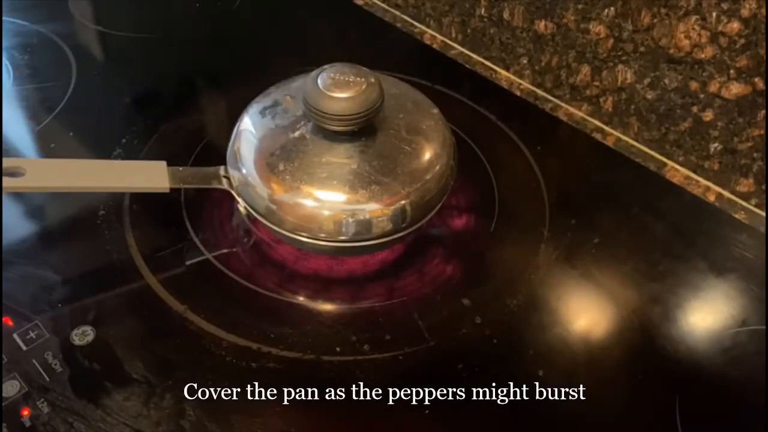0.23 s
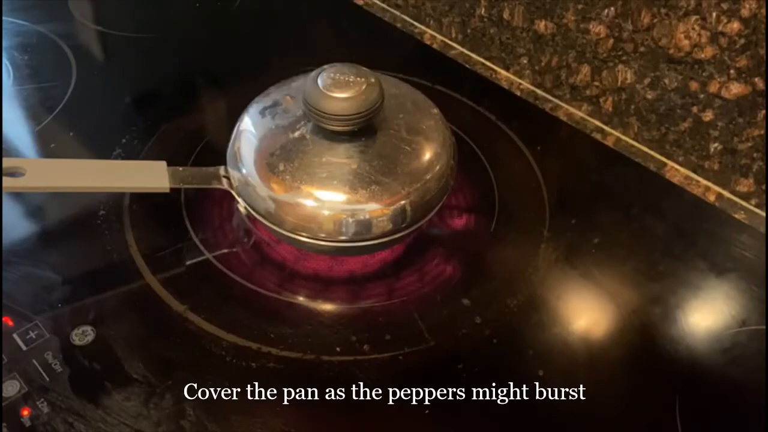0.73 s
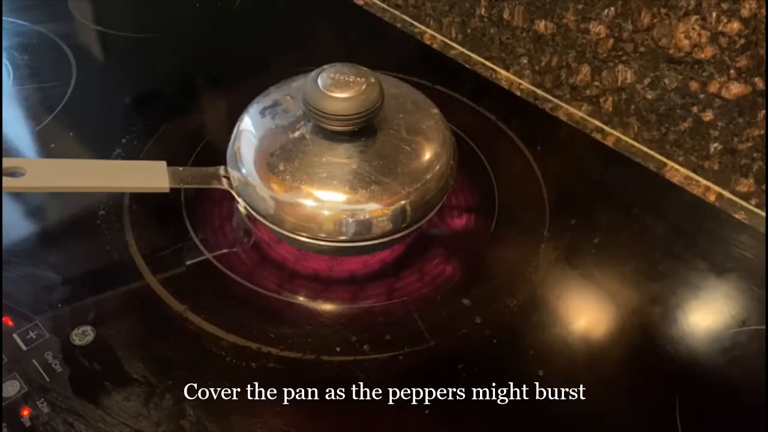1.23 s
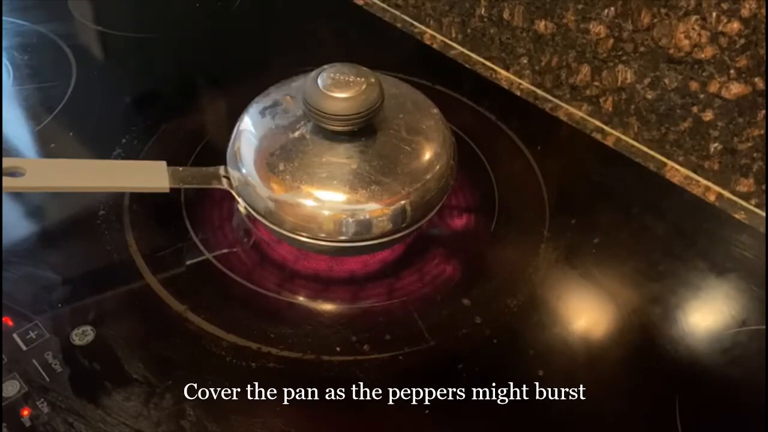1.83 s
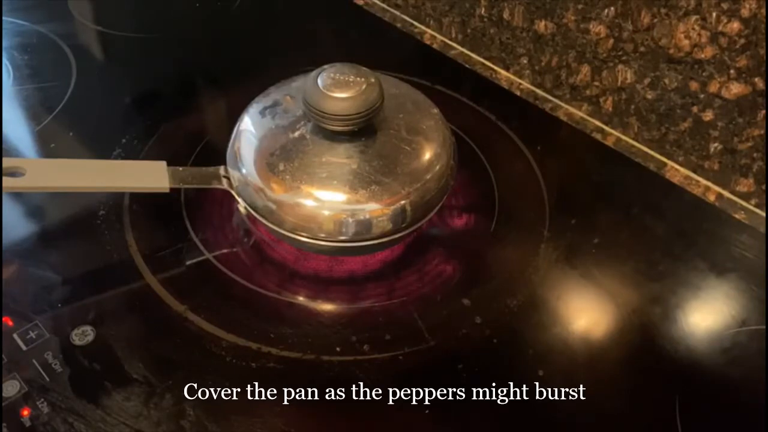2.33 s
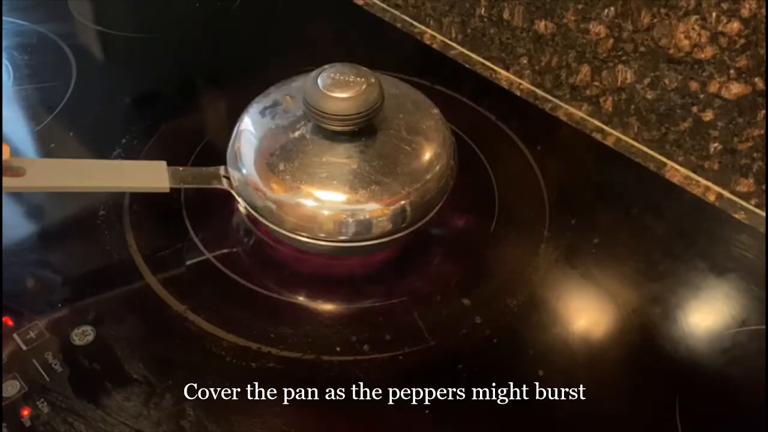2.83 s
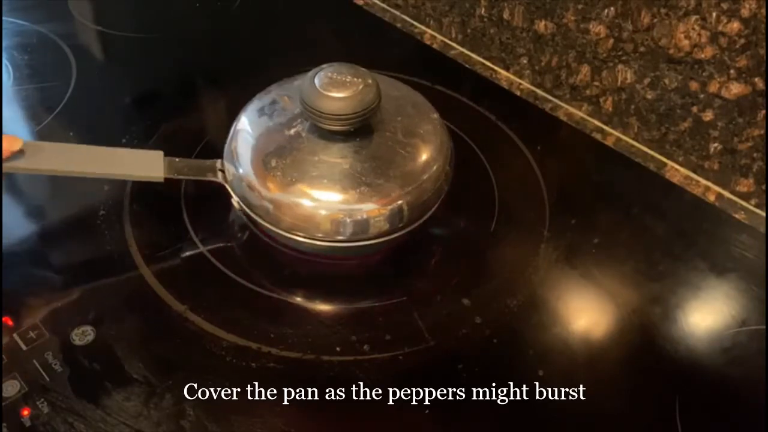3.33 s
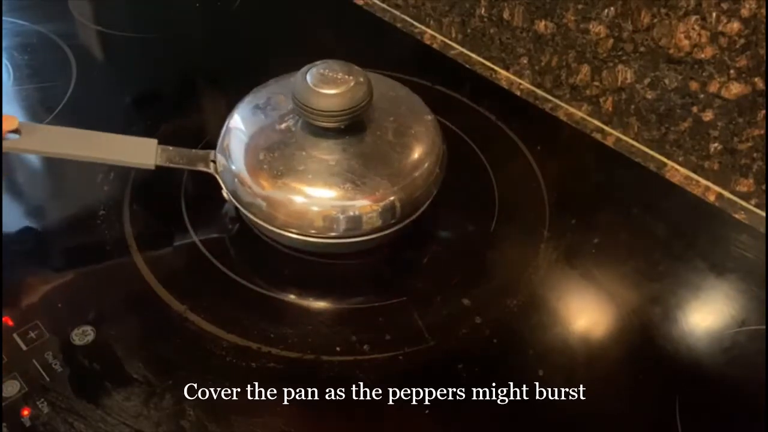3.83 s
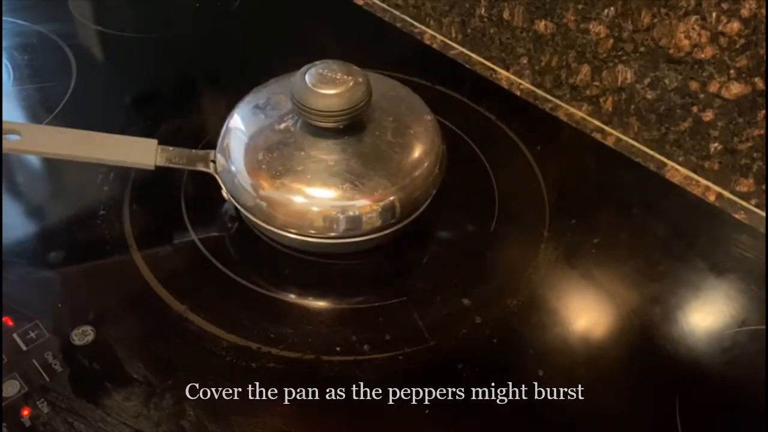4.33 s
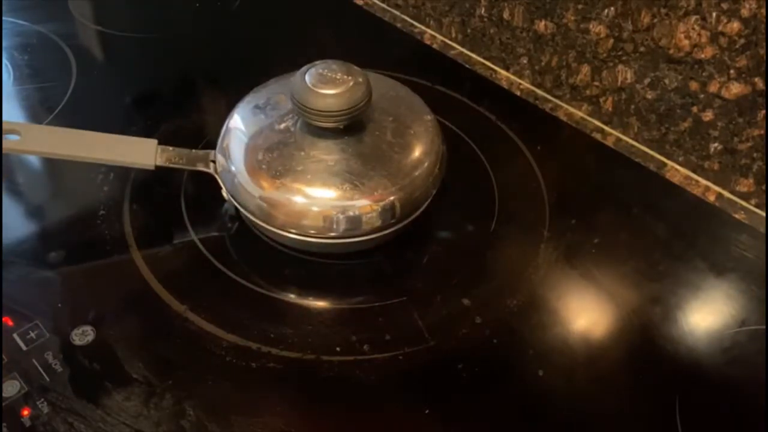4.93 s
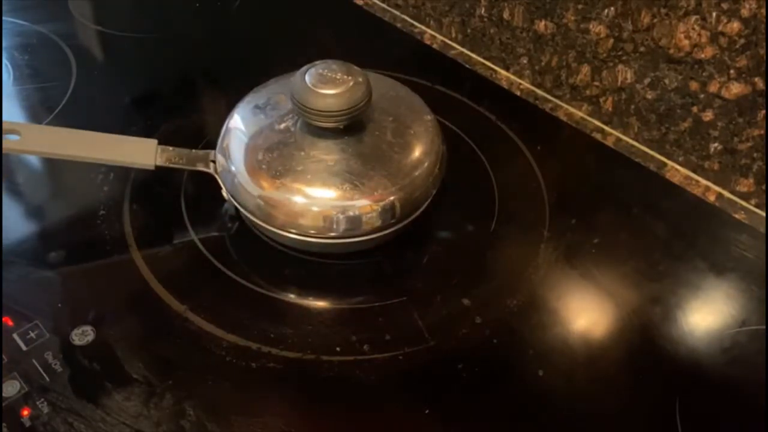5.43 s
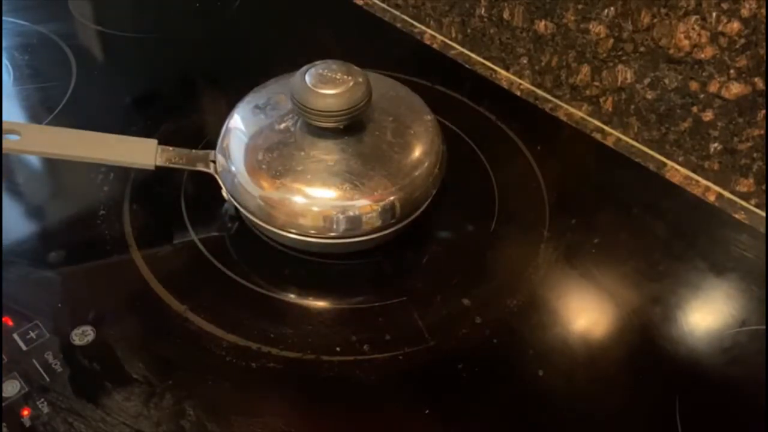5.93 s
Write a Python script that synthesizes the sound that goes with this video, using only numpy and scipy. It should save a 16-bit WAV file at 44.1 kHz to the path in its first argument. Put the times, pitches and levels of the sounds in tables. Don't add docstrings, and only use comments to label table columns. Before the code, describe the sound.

Peppers hiss softly in a covered pan, the metal lid ticking lightly under an extractor hum, with sharp bursts and steam gusts near the end.

```python
import sys
import numpy as np
from scipy import signal
from scipy.fft import rfft, irfft, next_fast_len
from scipy.io import wavfile
from scipy.ndimage import uniform_filter1d

SR = 44100
rng = np.random.default_rng(int(sys.argv[2]) if len(sys.argv) > 2 else 0)


def voltage_ratio(level):
    return 10 ** (np.asarray(level, float) / 20)


def dump(signal):
    limited = np.clip(np.atleast_2d(signal).T, -1, 1)
    pcm = np.round(limited * 32767).astype(np.int16)
    wavfile.write(sys.argv[1], SR, pcm)


N = 273067
TIME = np.arange(N) / SR
PAD = next_fast_len(N)
HZ = np.fft.rfftfreq(PAD, 1 / SR) + 1e-3
OPPOSITE = np.array([[1], [-1]])
CALM_DB = -88


# f/Hz, density/dB per Hz
HISS = [(3000, -18.5), (4500, 1.5), (6000, -1.5), (8000, 1), (10000, -3), (11500, -3), (12300, -9.5)]
# f/Hz, density/dB per Hz
SPUTTER = [(1500, -19), (2500, 0.5), (3500, -3), (5000, -10), (7000, -8.5)]


def sizzle():
    hiss_db = steam_db()
    extra_db = hiss_db - CALM_DB
    bright_db = -2.5 + 0.17 * extra_db + 1.6 * drift(8)
    bright_db = bright_db + sum(lift_db * gate(s, length) for s, length, *_, lift_db in GUSTS)
    sputter_db = -83 + 0.76 * extra_db + 1.5 * drift(22)

    hiss = coloured(grains(12000, spread_db=-2.5), HISS)
    treble_filter = signal.butter(4, 9200, "high", fs=SR, output="sos")
    top = signal.sosfiltfilt(treble_filter, hiss)
    hiss = voltage_ratio(hiss_db + 4.5 + 1.3 * drift(42)) * (hiss - top + voltage_ratio(bright_db + 5.5) * top)
    return hiss + voltage_ratio(sputter_db) * coloured(grains(8000, spread_db=-0.5), SPUTTER)


# t/s, flow as hiss level/dB
FRYING = [(0.0, -94.5), (0.45, -91.5), (0.76, -84), (1.05, -91.5), (1.45, -91), (1.85, -86.5), (2.1, -91),
          (3.1, -94), (3.33, -86), (3.65, -94), (4.2, -90), (4.55, -88), (4.8, -82.5), (5.0, -74),
          (5.1, -80.5), (5.4, -85.5), (6.19, -79.5)]
# t/s, length/s, level/dB, sag/dB per s, treble lift/dB
GUSTS = [
    (4.568, 0.13, -81.5, 13, -2),
    (5.123, 0.095, -73, 8, -4),
    (5.208, 0.13, -71, 9, -1),
    (5.44, 0.22, -69.5, 16, -3),
    (5.648, 0.22, -75.5, -4, 0.5),
    (5.846, 0.173, -72.5, 14, -0.5),
    (5.986, 0.136, -77.5, 1, 1),
    (6.148, .1, -72, 0, -5),
]


def steam_db():
    flow = voltage_ratio(np.interp(TIME, *np.transpose(FRYING))) ** 2
    for s, length, level_db, sag_db, _ in GUSTS:
        gust_db = level_db - sag_db * np.clip(TIME - s, 0, length)
        flow = flow + (gate(s, length) * voltage_ratio(gust_db)) ** 2
    after_db, after_t60_s = -24, 0.73
    for s, puff_db, *_ in BURSTS:
        vent_db = puff_db + after_db - 60 * np.maximum(TIME - s, 0) / after_t60_s
        flow = flow + (TIME > s) * voltage_ratio(vent_db) ** 2
    return 10 * np.log10(flow)


def gate(s, length):
    rise_s, fall_s = 0.055, 0.018
    return np.clip(np.minimum((TIME - s) / rise_s, 1 + (s + length - TIME) / fall_s), 0, 1)


def grains(per_s, spread_db):
    sizes = voltage_ratio(spread_db * np.minimum(rng.exponential(1, N), 5)) * rng.choice([-1, 1], N)
    return sizes * (rng.random(N) < per_s / SR)


# f/Hz, level/dB, t60/s
LID = [(3300, -5, .035), (3610, -5, .035), (3860, -7, .03), (4270, 0, .045), (4600, -6, .03),
       (5250, -1, .04), (5600, -6, .03), (6200, -6, .03), (6800, -6, .03), (7050, 1, .045), (7600, -6, .03),
       (8400, 2, .04), (9100, -6, .03), (9960, -5, .05)]
# f/Hz, density/dB per Hz
SPLASH = [(2200, -17), (3200, -1), (4500, 1), (6000, -6.5), (8500, 0), (10500, -10.5), (12000, -18)]


def lid_ticks():
    s, peak_db = touches()
    ring = struck(LID, s, peak_db - 16, spread_db=3.0)
    ring = ring + struck(LID, np.minimum(s + .017, TIME[-1]), peak_db - 21, spread_db=4.0)
    starts = np.full(N, 1e-18)
    starts[(s * SR).astype(int)] = voltage_ratio(peak_db - 7.5)
    splash = signal.lfilter([1], [1, -voltage_ratio(-60 / (.045 * SR))], starts)
    return ring + splash * coloured(rng.standard_normal(N), SPLASH)


# t into the turn/s, top peak level/dB
CONTACTS = [
    (.0088, -64),
    (.0515, -66),
    (.0590, -69),
]
# t/s, peak level/dB
TICKS = [(0.115, -55.5), (0.316, -58.5), (0.536, -65), (0.7346, -58.5), (0.8011, -70), (0.868, -60),
         (0.91, -62), (1.043, -58.5), (1.174, -60.5), (1.5287, -63), (1.5927, -63), (2.365, -62),
         (2.45, -63), (2.7806, -62), (2.9797, -63), (3.045, -61.5), (3.0876, -57.5), (3.4402, -61),
         (3.4836, -62), (3.746, -58), (3.834, -70.5), (4.0386, -58.5), (4.099, -62), (4.142, -59.5),
         (4.361, -60), (4.599, -57), (4.9324, -57), (5.062, -62), (5.414, -60.5), (6.181, -63)]
# t/s, peak level/dB
TAPS = [(0.058, -60), (0.1905, -76), (0.2064, -70), (0.3885, -67), (0.4559, -73), (0.5197, -69),
        (0.6449, -71), (0.9981, -67), (1.0574, -67), (1.2476, -71), (1.2625, -68), (1.3305, -66),
        (1.3738, -72), (1.701, -61), (1.8986, -57), (1.9734, -62), (2.0507, -78), (2.2962, -73),
        (2.7656, -69), (3.2276, -75), (3.5583, -72), (3.5728, -65), (3.68, -59), (3.8222, -65),
        (3.9429, -78), (4.0158, -68), (4.2073, -68), (4.2727, -67), (4.345, -66), (4.428, -59),
        (4.6833, -60), (4.7406, -66), (3.288, -65), (3.326, -56), (3.354, -56), (3.406, -61)]


def touches():
    turn_s, spread_db, tap_loss_db = .06598, 9, 4
    into, usual_db = np.transpose(CONTACTS)
    turns = np.arange(0, TIME[-1] - 2 * turn_s, turn_s)[:, None]
    light_db = usual_db - spread_db * np.abs(rng.standard_normal((len(turns), len(into))))
    firm, firm_db = np.transpose(TICKS + [(s, db - tap_loss_db) for s, db in TAPS])
    return np.append((turns + into).ravel(), firm), np.append(light_db.ravel(), firm_db)


def spatter(per_s, level_db):
    times = np.sort(rng.random(int(per_s * TIME[-1]))) * TIME[-1]
    return struck(LID, times, level_db - 5 * rng.exponential(1, len(times)), spread_db=4.0)


# t/s, puff level/dB, puff t60/s, puff brightness/dB per octave, rim ring level/dB
BURSTS = [
    (2.177, -54.5, 0.035, -2.5, -78),
    (2.195, -79, 0.18, -9, -95),
    (4.876, -59, 0.019, -8, -95),
    (4.956, -64.5, 0.028, 13, -61.5),
    (4.977, -79, 0.036, 20, -61),
]
# t/s, level/dB, thinness -1 to 1
CRACKS = [
    (2.179, -46, 0),
    (4.8765, -37.5, -.9),
    (4.957, -29, .85),
]
# f/Hz, width/Hz, level/dB
DOME = [(2000, 1100, -2), (2850, 630, 1), (4000, 750, 4), (4860, 860, -3), (5730, 800, 6.5), (6400, 490, 3),
        (7400, 1300, -4), (9000, 2000, 4), (10670, 2100, -9)]
# f/Hz, level/dB, t60/s
RIM = [(6332, -9, .1), (8900, -6, .05), (9938, 0, .14), (10008, -4, .12), (10250, -3, .05), (10542, -1, .1),
       (11298, -1, .12), (11800, -18, .2)]


def bursts():
    out, white = np.zeros(N), rng.standard_normal(N)
    for s, puff_db, t60, bright_db, _ in BURSTS:
        age = np.maximum(TIME - s, 0)
        fade_db = 60 * (age / t60) ** 2.84
        puff = white * (1 - np.exp(-age / 0.0033)) * voltage_ratio(puff_db + 10.5 - fade_db)
        for hz, width_hz, level_db in DOME:
            gain = voltage_ratio(level_db + bright_db * np.log2(hz / 5000))
            out += gain * resonance(resonance(puff, hz, width_hz), hz, width_hz)
    for s, crack_db, thin in CRACKS:
        out[int(s * SR) + np.arange(3)] += voltage_ratio(crack_db) * np.array([1, -2 * thin, thin ** 2])
    s, ring_db = np.array(BURSTS)[:, [0, 4]].T
    out += struck(RIM, s, ring_db + 3, spread_db=1.5)
    return signal.sosfilt(signal.butter(1, 1200, "high", fs=SR, output="sos"), out)


# t/s, level/dB
SLIDE = [
    (3.27, -100),
    (3.288, -68.5),
    (3.33, -68),
    (3.365, -71),
    (3.385, -100),
]
# f/Hz, density/dB per Hz
GRIT = [(1800, -9.5), (2800, 4), (4000, -1.5), (5500, -7), (7500, -4.5), (10500, -15.5)]


def slide():
    s, level_db = np.transpose(SLIDE)
    return voltage_ratio(np.interp(TIME, s, level_db)) * coloured(grains(5100, spread_db=-2.5), GRIT)


def kitchen(x, lean_db, echo_db, t60):
    echoes = rms_one(rng.standard_normal(N) * voltage_ratio(-60 * TIME / t60)) / np.sqrt(N)
    side = voltage_ratio(echo_db) * rfft(echoes, PAD) * diffuse() * OPPOSITE
    return shaped(x, (1 + side) * sides(lean_db * diffuse()))


# level/dB rms, left-right/dB
HUM = [(-41.5, -1), (-56, -7.5), (-73.5, -6), (-71.5, -2), (-72.5, -3), (-80.5, 4.5)]
# f/Hz, width/Hz, level/dB rms, left-right/dB
WHEEL = [(91.35, 1.43, -50, -3), (625, 0.72, -69, -6), (2850, 3.5, -89.5, 16), (1900, 8.3, -84.5, -3)]


def fan_tones():
    mains_hz, orders = 60.04, (2, 4, 6, 8, 12, 18)
    out = np.zeros((2, N))
    for order, (level_db, lean_db) in zip(orders, HUM):
        cycles = order * mains_hz * TIME + rng.random()
        tone = np.sqrt(2) * voltage_ratio(level_db) * np.sin(2 * np.pi * cycles)
        out += sides(lean_db)[:, None] * tone
    for hz, width_hz, level_db, lean_db in WHEEL:
        tone = resonance(rng.standard_normal(N + SR), hz, width_hz)
        tone = resonance(tone, hz, 3 * width_hz)[SR:]
        out += sides(lean_db)[:, None] * voltage_ratio(level_db) * rms_one(tone)
    return out


def blade_tone(lean_db, wander_hz):
    turns = np.cumsum(258.3 + wander_hz * drift(2.62)) / SR
    level_db = -59.5 + 4.5 * drift(3.0)
    return sides(lean_db)[:, None] * np.sqrt(2) * voltage_ratio(level_db) * np.sin(2 * np.pi * turns)


# f/Hz, density/dB per Hz
RUMBLE = [(22, -28.5), (45, -19.5), (60, -7.5), (73, 0), (85, -14), (105, -2.5), (145, -2.5), (168, -14),
          (195, -5.5), (228, -16), (258, -10), (282, -14.5), (330, -23), (460, -35)]
# f/Hz, density/dB per Hz
DUCT = [(330, -5), (455, -5.5), (500, 3), (535, -4), (615, 0.5), (665, 1), (770, -2), (800, -4.5),
        (855, -12), (900, -2.5), (955, -6.5), (1050, -7.5), (1150, -10), (1250, -17.5)]
# f/Hz, density/dB per Hz
AIR = [(1150, -19), (1300, 2), (1500, 1), (1700, 2), (2090, -0.5), (2290, -5), (2970, -9), (3860, -16.5),
       (4400, -19.5), (4820, -23), (7030, -38.5), (8540, -34.5), (11500, -47.5)]
# f/Hz, likeness 0 to 1
ALIKE = [(25, 0.88), (60, 1), (130, 0.96), (200, 0.93), (270, 0.36), (580, 0.58), (1230, 0.48),
         (2630, 0.69), (5590, 0.8), (9000, 0.43)]
# f/Hz, left-right/dB
LEAN = [(60, 0.5), (160, -3), (260, 1), (500, -2), (780, 2), (920, 1), (2000, 0.5), (4000, 3), (7000, 1)]


def fan_noise():
    white = rng.standard_normal((3, 2, N))
    rush = voltage_ratio(-53.5) * coloured(white[1], DUCT) + voltage_ratio(-64) * coloured(white[2], AIR)
    mid, side = voltage_ratio(-43) * coloured(white[0], RUMBLE) + voltage_ratio(1.5 * drift(2.4)) * rush
    alike, lean = np.clip(at_hz(ALIKE), 0, 1), sides(at_hz(LEAN) * diffuse())
    shared = shaped(mid, np.sqrt((1 + alike) / 2) * lean)
    return shared + shaped(side, np.sqrt((1 - alike) / 2) * diffuse() * lean * OPPOSITE)


def diffuse():
    return .19 + .81 / (1 + (HZ / 6100) ** 16)


def sides(lean_db):
    return voltage_ratio(np.array([lean_db / 2, -lean_db / 2]))


def struck(modes, times, blows_db, spread_db):
    at, out = (np.array(times) * SR).astype(int), np.zeros(N)
    chance = rng.standard_normal((len(at), 2 * len(modes)))
    for k, (hz, level_db, t60) in enumerate(modes):
        blow_db = blows_db + level_db + spread_db * chance[:, 2 * k]
        clicks = np.full(N, 1e-18)
        clicks[at] = voltage_ratio(blow_db) * np.sign(chance[:, 2 * k + 1])
        r, w = voltage_ratio(-60 / (t60 * SR)), 2 * np.pi * hz / SR
        out += signal.lfilter([0, np.sin(w)], [1, -2 * r * np.cos(w), r * r], clicks)
    return out


def resonance(x, hz, width_hz):
    r = np.exp(-np.pi * width_hz / SR)
    poles = [1, -2 * r * np.cos(2 * np.pi * hz / SR), r * r]
    return signal.lfilter([(1 - r * r) / 2, 0, (r * r - 1) / 2], poles, x)


def drift(rate):
    r = np.exp(-2 * np.pi * rate / SR)
    return rms_one(signal.lfilter([1], [1, -2 * r, r * r], rng.standard_normal(N + SR))[SR:])


def coloured(x, spectrum):
    shut = [(spectrum[0][0] / 2, -70)] + list(spectrum) + [(spectrum[-1][0] * 2, -70)]
    return rms_one(shaped(x, voltage_ratio(at_hz(shut))))


def shaped(x, response):
    lead = (PAD - N) // 2
    wide = np.pad(x, [(0, 0)] * (x.ndim - 1) + [(lead, PAD - N - lead)], "reflect")
    return irfft(rfft(wide) * response, PAD)[..., lead:lead + N]


def at_hz(points):
    hz, value = np.transpose(points)
    return np.interp(np.log(HZ), np.log(hz), value)


def rms_one(x):
    return x / np.sqrt(np.mean(x ** 2) + 1e-20)


def scene():
    drops = lid_ticks() + spatter(per_s=40, level_db=-83)
    pan = kitchen(sizzle() + drops + bursts() + slide(), lean_db=4.5, echo_db=-4.0, t60=.02)
    return pan + fan_noise() + fan_tones() + blade_tone(lean_db=-11.0, wander_hz=1.17)


def squelch(x, floor_db, margin_db, waver_db, jump_db):
    run_in = 2048
    x = np.pad(x, ((0, 0), (run_in, run_in)), "reflect")
    sum_difference = np.array([x[0] + x[1], x[0] - x[1]]) / 2
    hz, _, cells = signal.stft(sum_difference, SR, nperseg=2048, noverlap=1024)
    power = np.abs(cells) ** 2
    band = np.arange(len(hz)) // 10 * 10
    level = 10 * np.log10(uniform_filter1d(power, size=10, axis=1, origin=-5)[:, band] + 1e-20)
    treble = 10 * np.log10(np.mean(power[:, hz > 4000], axis=(0, 1)) + 1e-20)
    hz = hz[:, None]

    bar = np.maximum(floor_db, np.where(hz > 9600, treble - 4.5, floor_db))
    bar = np.maximum(bar, level[::-1] - margin_db)
    waver = rms_one(uniform_filter1d(rng.standard_normal(level.shape), size=3))
    bar = bar + waver_db * waver[:, band]
    sudden = np.diff(treble, prepend=treble[0]) > jump_db
    keep = (level > bar) & (hz < 11900) | (hz < 2200) | sudden
    kept = signal.istft(cells * keep, SR, nperseg=2048, noverlap=1024)[1]
    mid, side = kept[:, run_in:run_in + N]
    return np.array([mid + side, mid - side])


def low_pass(x):
    return signal.sosfilt(signal.butter(12, 12510, fs=SR, output="sos"), x)


# f/Hz, phase by which left leads/rad
PORTS = [(180, 0), (600, .8), (950, -.4), (2150, .4), (3450, .1), (5800, 0), (7200, -.2), (8600, -2.9),
         (9500, -3.4), (10700, -6.05), (13000, -6.4)]


def record(dry):
    ports = np.exp(.5j * at_hz(PORTS) * OPPOSITE)
    ported = shaped(dry, ports / (1 + (HZ / 11900) ** 30))
    ported = ported * np.minimum((TIME[-1] - TIME) / .004, 1)
    mix = squelch(ported, floor_db=-115, margin_db=8, waver_db=3.2, jump_db=5.8)
    return low_pass(mix)


dry = scene()
out = record(dry)
dump(out)
```